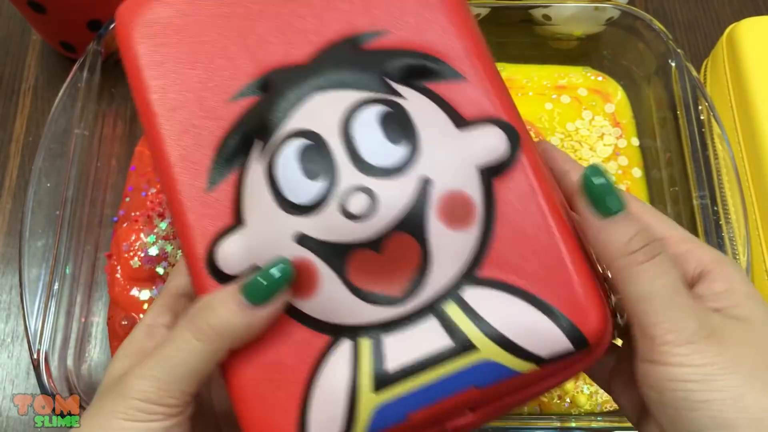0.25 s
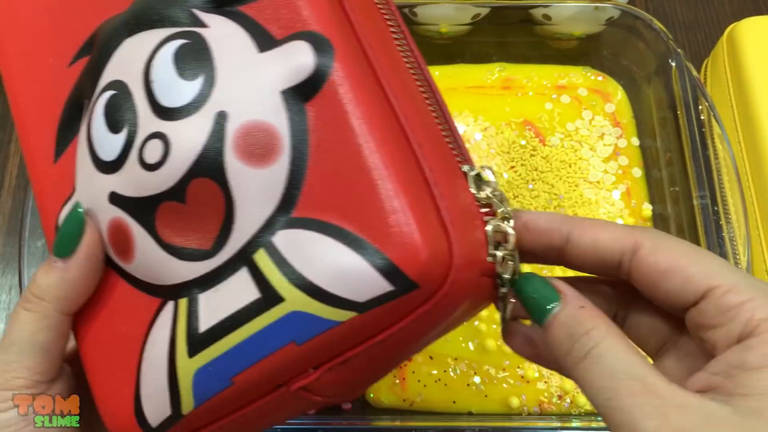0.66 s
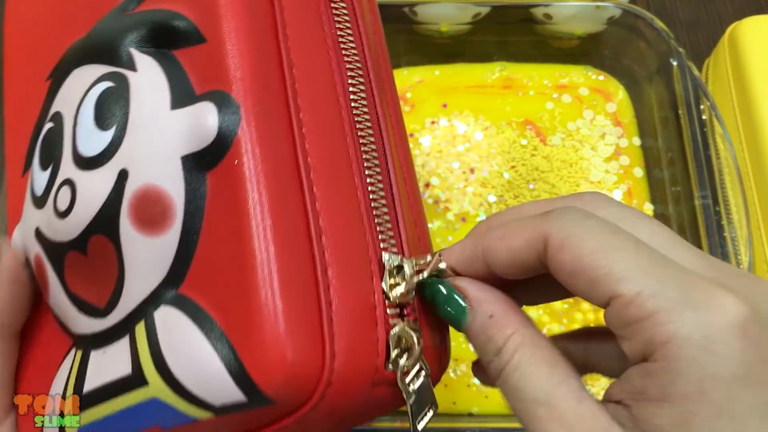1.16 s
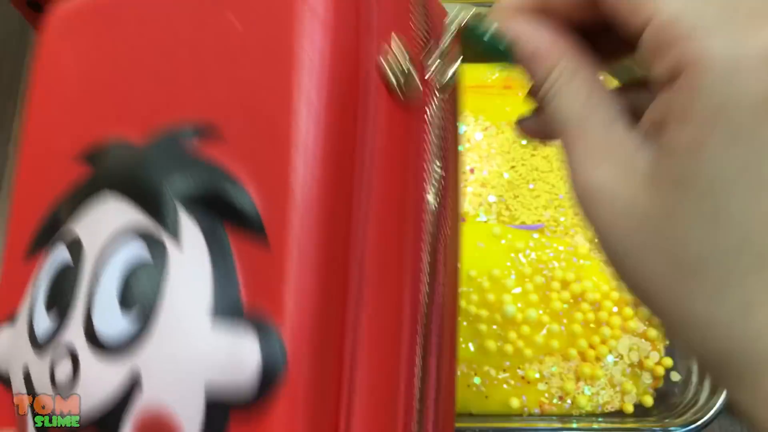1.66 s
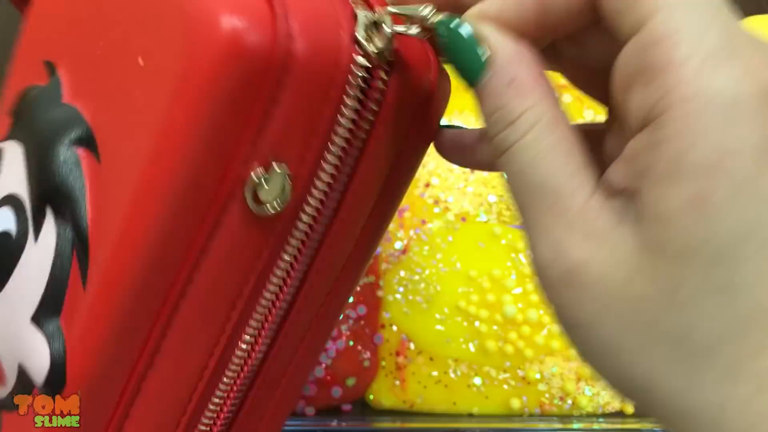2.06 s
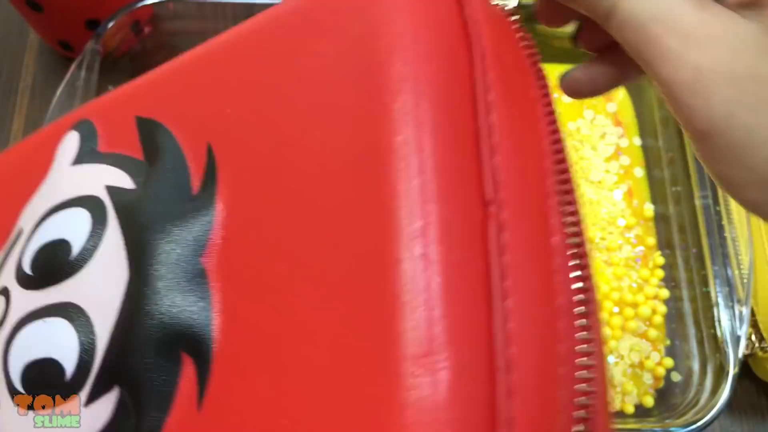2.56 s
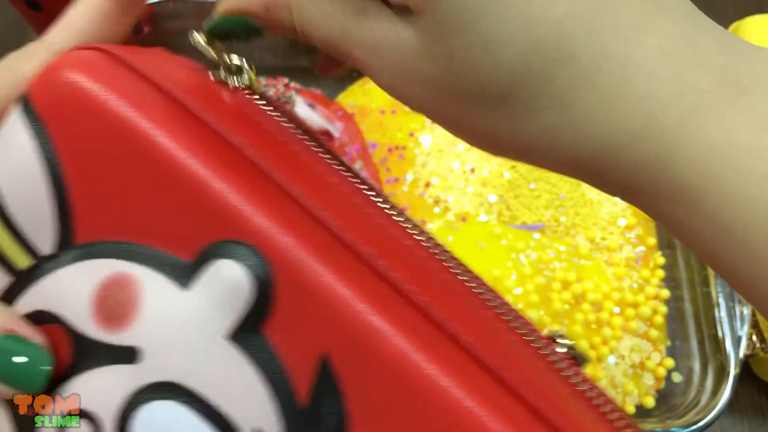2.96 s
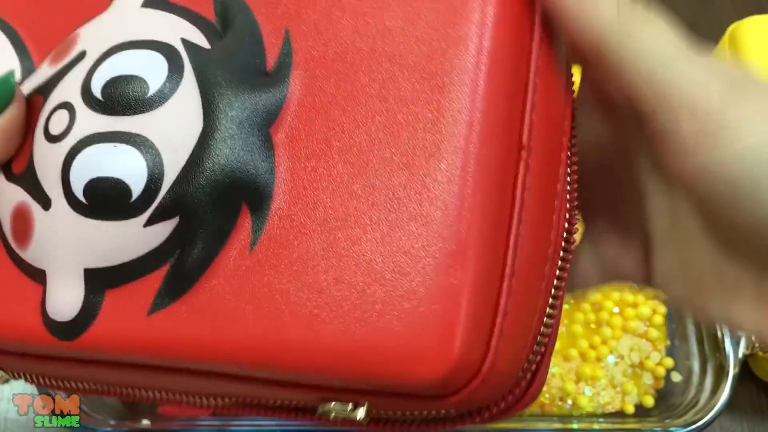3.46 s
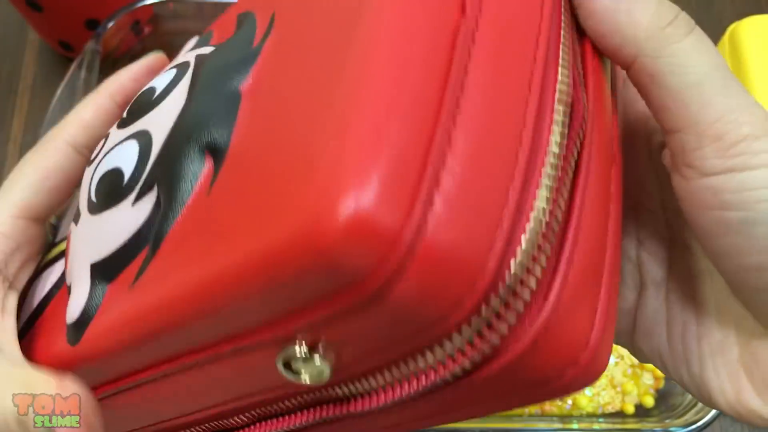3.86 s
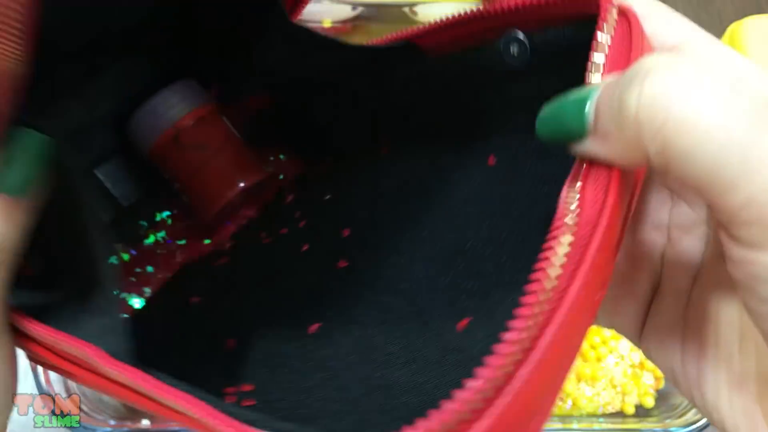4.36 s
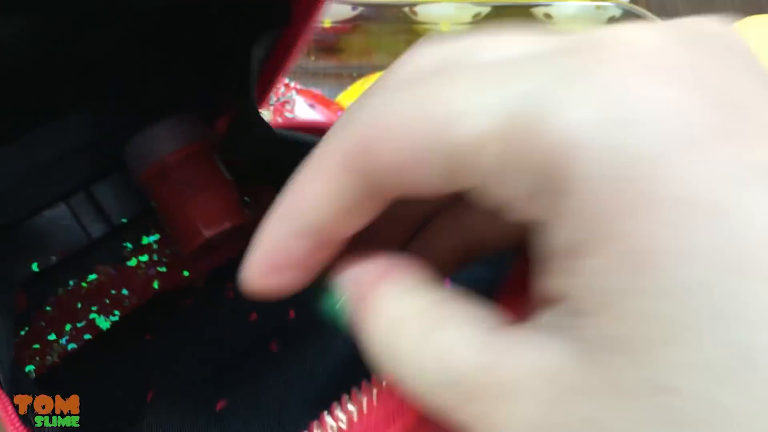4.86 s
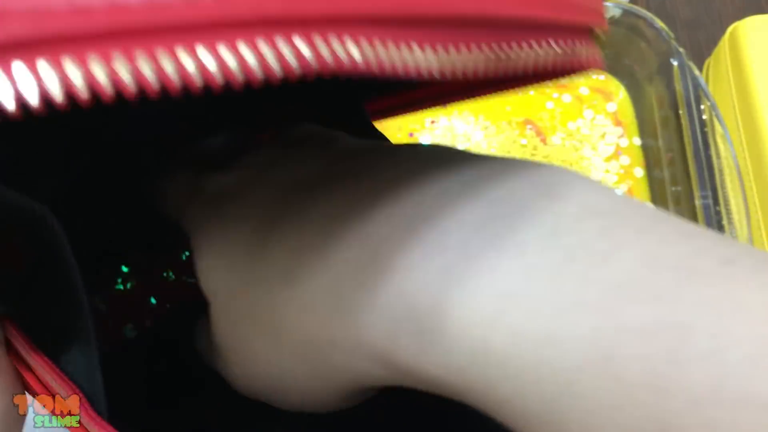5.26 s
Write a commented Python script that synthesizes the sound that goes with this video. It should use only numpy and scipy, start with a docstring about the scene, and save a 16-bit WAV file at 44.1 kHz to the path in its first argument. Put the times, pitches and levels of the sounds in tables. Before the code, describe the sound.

A stiff leatherette case is handled close to the microphone in a small, quiet room. From about 0.3 to 1.7 seconds the metal pull tabs of its zip tick and clink lightly under faint finger rubbing. At 1.8 seconds the zip makes a quick, rasping pull that buzzes through the shell and ends in a bump just after 2 seconds. More clinks follow, then three pulls in quick succession from 2.7 to 3.4 seconds. The tabs clink sharply around 3.6 to 3.7 seconds. The lid creaks briefly near 3.8 seconds and comes open with a loud, hollow cluster of knocks at about 4.1, creaking again around 4.5. From there until about 5.6 seconds a hand slides in over the cloth lining with soft rubbing, tiny ticks from the loose zip teeth and a few light knocks of small containers.

```python
"""Unzipping a make-up case

A stiff leatherette case is opened close by in a small room. Fingers fumble with the clinking
metal pull tabs, then draw the slider round in three quick pulls and a slow creep. Each zip
tooth clicks and kicks the shell, making it buzz. The lid creaks and is prised open with
a hollow knock, and a hand slides in over the cloth lining."""
import sys
import numpy as np
from scipy import signal
from scipy.fft import rfft, irfft, next_fast_len
from scipy.io import wavfile
from scipy.ndimage import uniform_filter1d

SR = 44100
rng = np.random.default_rng(int(sys.argv[2]) if len(sys.argv) > 2 else 0)


def to_wav(s):
    """Save 16-bit WAV."""
    ch = np.atleast_2d(s).T  # columns
    pcm = np.round(np.clip(ch, -1, 1) * 32767)  # PCM
    wavfile.write(sys.argv[1], SR, pcm.astype(np.int16))


N = 243431
TIME = np.arange(N) / SR

# Levels in the tables are relative. A ring time (t60) is the time taken to fade by 60 dB.
# Tone of the quiet room. Each row: frequency in Hz, level in dB.
ROOM_TONE = [(15, -21), (25, -45), (38, -4.5), (66, -12.5), (114, 0), (127, -7), (141, -29), (185, -7.5),
             (270, -33), (335, -59), (775, -40), (1940, -30.5), (5280, -36), (14000, -41), (16000, -49)]

# Low, middle and high parts of a sliding hand's sound. Each row: frequency in Hz, level in dB.
RUMBLE_TONE = [(35, -67), (60, 2), (108, -6.5), (189, -1), (265, -1.5), (395, -1), (470, -4.5), (584, 2),
               (695, -11), (800, -4), (1040, -52.5), (1760, -120)]
RUB_TONE = [(350, -29), (600, 7), (698, 6.5), (871, 0.5), (997, 0.5), (1110, 0.5), (1390, 2), (1580, -2),
            (1880, -6), (2290, 0), (3180, -17), (3550, 0), (4000, -11), (5200, -50.5), (8800, -120)]
HISS_TONE = [(1880, -39), (3200, 4), (3690, 9), (4020, -1), (5410, -3), (6030, 1), (8380, -2.5),
             (10500, -2), (11500, -5.5), (14100, -1), (16000, -12)]
# Hand strokes. Each row: start and length in seconds, then rumble, rub and hiss levels in dB.
HAND_STROKES = [(0.459, 0.12, -61.5, -64, -63), (0.56, 0.47, -63, -70, -70.5), (1.178, .6, -56, -63, -66.5),
                (1.38, 0.099, -66, -61, -57), (1.725, 0.084, -52.5, -55.5, -59),
                (2.05, 0.16, -47.5, -51.5, -53.5), (2.195, .44, -55.5, -58, -61),
                (2.388, 0.039, -47, -49, -50.5), (2.533, 0.059, -43.5, -47.5, -56),
                (2.83, 0.13, -42, -51, -56), (3.006, 0.13, -46, -50, -61), (3.323, .11, -43.5, -46, -50.5),
                (3.43, .33, -57.5, -53, -58.5), (3.75, .11, -49.5, -45, -52.5),
                (3.897, 0.052, -54, -44.5, -48), (3.961, .12, -45, -44, -47),
                (4.065, 0.12, -37.5, -48, -52), (4.194, 0.38, -59.5, -56.5, -60.5),
                (4.424, 0.062, -46, -44.5, -48.5), (4.554, 0.18, -53.5, -47.5, -49),
                (4.832, 0.036, -57.5, -51.5, -51.5), (4.87, 0.12, -65, -63.5, -63),
                (4.978, 0.046, -55, -52.5, -52.5), (5.048, 0.037, -56.5, -50, -57),
                (5.141, 0.22, -56.5, -48, -47.5), (5.279, 0.16, -52.5, -45, -46)]
# Ring of loose zip teeth. Each row: frequency in Hz, width in Hz, level in dB.
TICK_RESONANCES = [(10400, 500, 0), (10550, 400, 3), (13400, 1500, 0)]
# Air inside the open case. Each row: frequency in Hz, width in Hz, level in dB.
AIR_RESONANCES = [(152, 48, 11), (692, 39, -8), (1470, 72, 0), (1540, 100, 5.5)]

# Fingers, lid and small containers bumping the shell.
# Each row: time in seconds, boom level in dB, clack level in dB, boom pitch in Hz.
BUMPS = [(2.04, -18.5, -35, 470), (2.051, -20, -37, 400), (2.188, -24.5, -45, 410), (2.245, -32, -56, 183),
         (2.348, -29.5, -48, 410), (2.409, -29, -37.5, 367), (2.634, -36, -46, 865),
         (2.925, -27, -50, 322.7), (3.1, -27.5, -29, 194), (3.412, -30, -35, 412),
         (3.569, -38.5, -38.5, 662), (3.697, -23, -40, 610), (3.964, -36.5, -34, 193),
         (4.083, -9, -25.5, 556), (4.094, -22, -28, 605), (4.113, -19, -27, 547), (4.133, -27, -45, 600),
         (4.178, -22.5, -30, 397), (4.531, -36.5, -30, 536), (4.647, -31.5, -48, 710),
         (4.734, -34, -31.5, 650), (4.765, -47, -32, 710), (5.021, -29.5, -36, 710), (5.206, -38, -49, 388),
         (5.51, -37, -37.5, 690)]
# The stiff lid bending. Each row: start and end in seconds, then boom and clack levels in dB.
LID_CREAKS = [(3.78, 3.875, -38.5, -30.5), (3.908, 3.96, -50, -39), (4.446, 4.505, -35.5, -38.5)]
# Notes of the hollow case. Each row: frequency in Hz, level in dB, ring time in seconds.
CASE_MODES = [(125, 2, 0.16), (166.5, -2, 0.25), (232, -6.5, 0.23), (327, 5, 0.064), (423, -5.5, 0.086),
              (560, -9.5, 0.039), (602, -3, 0.033), (824, 10, 0.013), (996, 23.5, 0.009),
              (1425, -6.5, 0.069)]
# Tones of a hard contact and of the lightly tapped shell. Each row: frequency in Hz, level in dB.
CLACK_TONE = [(500, -41), (900, 7), (1400, 7), (2200, 2), (3000, -2.5), (4200, -4.5), (7000, -14),
              (11000, -9)]
NUDGE_TONE = [(130, -15.5), (250, -4.5), (420, 5.5), (580, -2.5), (900, -12)]

# Pull tabs hitting the slider and each other.
# Each row: time in seconds, then tinkle, clack and shell levels in dB, then tinkle pitch in Hz.
TAB_HITS = [(0.3068, -55, -51, -45, 13100), (0.566, -44, -37.5, -42, 13600),
            (0.5746, -49, -41, -36.5, 14700), (0.6673, -60, -48, -38.5, 12600),
            (0.6996, -45, -43.5, -35, 12700), (0.7227, -37.5, -42, -48, 13100),
            (0.8986, -44, -41.5, -38, 10400), (0.928, -37.5, -38, -34, 10400),
            (0.9432, -43, -45, -55, 10770), (0.964, -61, -32, -39, 9860), (0.9754, -54, -39, -36.5, 10300),
            (1.0204, -49, -44, -38, 9610), (1.1933, -30, -36.5, -32, 11000),
            (1.2293, -38, -39.5, -44, 10700), (1.2479, -39, -37, -36, 12600), (1.267, -39, -43, -37, 10900),
            (1.361, -33, -44, -52, 12200), (1.3941, -37, -43, -41, 9700), (1.4032, -38, -28.5, -29, 13800),
            (1.4463, -31, -35, -33.5, 9830), (1.4517, -32, -31, -39, 9800), (1.49, -40.5, -48, -50, 10800),
            (1.507, -42, -39, -40.5, 9900), (1.566, -49, -39.5, -51, 9400), (1.5868, -43, -32, -34, 10700),
            (1.6228, -38, -34, -31.5, 8300), (1.734, -36, -46, -62, 13900),
            (2.2152, -32.5, -33, -40, 10700), (2.2305, -36, -28, -36, 10930),
            (2.5588, -32, -35, -31, 13100), (2.5665, -31, -32, -30, 14400), (2.6013, -24, -27, -25, 13800),
            (2.902, -41, -54, -52, 13900), (3.0671, -51, -35.5, -39, 10120),
            (3.3959, -39.5, -30.5, -34, 10370), (3.6356, -24.5, -19.5, -21.5, 10540),
            (3.6595, -40, -29, -30, 9500), (3.676, -28.5, -26, -35, 10700),
            (3.705, -23.5, -23.5, -27.5, 9900), (4.4763, -31.5, -42, -33, 12500),
            (5.177, -48, -33, -46, 12500), (5.4213, -41, -34.5, -52, 14300)]
# Notes of a freely hanging tab. Each row: frequency in Hz, level in dB, ring time in seconds.
TAB_MODES = [(7000, 7, .1), (9430, 4, 0.8), (10410, 7, 0.21), (11900, -31, .08), (12900, 8, .06),
             (13480, 13.5, 0.071), (12300, -5, 0.2), (13700, -3, 0.27), (14330, -28, 0.14)]

# Slider speed, one list for each pull. Each row: time in seconds, speed in teeth per second.
PULL_SPEEDS = [
    [(1.8, 71), (1.83, 98.5), (1.848, 157.7), (1.868, 180), (1.914, 236), (1.93, 274), (1.966, 316),
     (2.058, 366), (2.09, 352.5)],
    [(2.69, 83), (2.722, 129.0), (2.754, 280), (2.758, 287), (2.796, 507), (2.802, 541.9), (2.824, 523),
     (2.874, 493), (2.88, 440)],
    [(2.91, 99.7), (2.928, 125.4), (2.974, 206), (2.982, 209.3), (3.004, 178), (3.016, 162), (3.032, 143.2),
     (3.046, 121.1), (3.05, 100)],
    [(3.09, 75), (3.144, 182), (3.17, 243.2), (3.202, 317), (3.232, 318), (3.26, 300.1), (3.298, 200),
     (3.32, 121), (3.36, 73.9)],
]
# Zip pulls. Each row: start and easing-off time in seconds; buzz, rasp and click levels in dB at the
# usual speed; time in seconds and boost in dB of the shell's boom; the same two for the slider's bite.
ZIP_PULLS = [(1.798, 2.016, -26, -25.5, -28.5, 1.964, 10, 2.008, 1),
             (2.675, 2.83, -30.5, -32.5, -36, 2.775, 2.5, 2.8, 2),
             (2.917, 3.016, -33, -38, -46.5, 3.0, 3, 2.965, 4),
             (3.097, 3.335, -27, -27.5, -33, 3.155, 3.5, 3.252, 7.5)]
# Tone of the shell on each side that the slider runs along. Each row: frequency in Hz, level in dB.
RIGHT_SIDE_TONE = [(41, -66), (70, -21), (129, -26), (173, -11), (248, -8), (316, -7.5), (511, -10.5),
                   (554, -55), (800, -21.5), (1040, -55), (1760, -120)]
TOP_SIDE_TONE = [(41, -47), (70, 0.5), (129, -3), (188, 6), (243, -4.5), (323, 6), (506, -3), (633, -10.5),
                 (800, -4), (1040, -45), (1760, -120)]
LEFT_SIDE_TONE = [(41, -71), (70, -34), (134, -33), (173, -3.5), (298, -3), (369, -5), (620, -6),
                  (715, -13.5), (800, -2.5), (1040, -57), (1760, -120)]
# Tones of the zip's rasping tape and clicking teeth. Each row: frequency in Hz, level in dB.
TAPE_TONE = [(380, -27), (650, -2.5), (672, -12.5), (783, -10.5), (957, -6.5), (1120, -8), (1290, -5.5),
             (1630, -12.5), (1800, -6.5), (1940, -10.5), (3200, -17.5), (4160, -18), (7040, -120)]
TEETH_TONE = [(1650, -48.5), (2800, 6.5), (3150, -4), (3460, 6.5), (4090, -2), (4700, -3.5), (5130, -6.5),
              (5560, -4.5), (6200, 0), (8360, -5.5), (10300, -6.5), (11700, -11.5), (15000, -10),
              (16000, -34)]
# Ring of the slider and the rows of teeth. Each row: frequency in Hz, width in Hz, level in dB.
SLIDER_RESONANCES = [(1305, 28, -1.5), (1700, 50, -16), (2260, 86, -15), (3890, 40, 3), (3730, 36, 10),
                     (4405, 30, -26), (4980, 180, 2), (6430, 26, -22)]


def from_db(db):
    """Turn decibels into a number to multiply by."""
    return 10 ** (np.asarray(db) / 20)


def rms_one(x):
    """Scale a sound so that its average strength (rms) is 1."""
    return x / np.sqrt(np.mean(x ** 2) + 1e-20)


def unit_hit(x):
    """Scale a hit so that its first 10 ms have a strength of 1."""
    return x / np.sqrt(np.mean(x[:SR // 100] ** 2) + 1e-20)


def evened(x, window_s=0.059):
    """Keep a sound's strength near 1 from moment to moment."""
    size = int(window_s * SR)
    power = uniform_filter1d(uniform_filter1d(x ** 2, size), size)
    return x / np.sqrt(np.abs(power) + 1e-12)


def coloured(x, tone):
    """Filter a sound to follow a tone table, falling steeply past the table's ends."""
    size = next_fast_len(len(x) + 4096, True)
    hz, db = np.transpose(tone)
    octave, points = np.log2(np.maximum(np.fft.rfftfreq(size, 1 / SR), 1)), np.log2(hz)
    outside = np.abs(octave - np.clip(octave, points[0], points[-1]))
    curve_db = np.interp(octave, points, db) - np.minimum(24 * outside, 60)
    # minimum phase: the filter rings after a hit, never before it
    cepstrum = irfft(np.log(from_db(curve_db)), size)
    cepstrum[1:size // 2] *= 2
    cepstrum[size // 2:] = 0
    return irfft(rfft(x, size) * np.exp(rfft(cepstrum)), size)[:len(x)]


def resonant(x, peaks):
    """The ringing that a set of resonances adds to a sound."""
    out = 0
    for hz, width, db in peaks:
        r = np.exp(-np.pi * width / SR)
        feedback = [1, -2 * r * np.cos(2 * np.pi * hz / SR), r * r]
        out = out + from_db(db) * (1 - r * r) / 2 * signal.lfilter([1, 0, -1], feedback, x)
    return out


def drift(turns_per_s):
    """A random wobble, about 1 in size."""
    knots = rng.standard_normal(2048)
    return np.interp(TIME * turns_per_s, np.arange(len(knots)), knots)


def rise(t, rise_s):
    """Climb smoothly from 0 towards 1."""
    return 1 - np.exp(-t / rise_s)


def fade(t, t60):
    """Die away by 60 dB in t60 seconds."""
    return from_db(-60 * t / t60)


def envelope(start, stop, attack_s, t60):
    """Swell, hold until the stop, then die away."""
    return np.clip((TIME - start) / attack_s, 0, 1) * fade(np.maximum(TIME - stop, 0), t60)


def favour(modes, centre_hz, db_per_octave):
    """The spot that is struck favours the notes near its own pitch."""
    return [(hz, db - db_per_octave * abs(np.log2(hz / centre_hz)), t60) for hz, db, t60 in modes]


def struck(modes, t, spread_db, detune):
    """An object's notes ring and fade; grip and point of contact vary their strength and pitch."""
    out = 0
    for k, (hz, db, t60) in enumerate(modes):
        strength = (-1) ** k * from_db(db + spread_db * rng.standard_normal())
        pitch = hz * (1 + detune * rng.standard_normal())
        out = out + strength * np.sin(2 * np.pi * pitch * t) * fade(t, t60)
    return out


def crack(t, t60, tail_db, tail_t60, rise_s):
    """Two things touch: a short burst of noise with a faint rattle after it."""
    decay = fade(t, t60) + from_db(tail_db) * fade(t, tail_t60)
    return rng.standard_normal(len(t)) * rise(t, rise_s) * decay


def add(out, start_s, sound):
    """Mix a sound in at the given time."""
    at = round(start_s * SR)
    out[at:at + len(sound)] += sound[:max(N - at, 0)]


def room_tone(level_db=-60):
    """The quiet room: a faint, steady, low noise."""
    return from_db(level_db) * rms_one(coloured(rng.standard_normal(N), ROOM_TONE))


def room_echo(x, t60=0.62, treble_t60=0.48, echo_db=-16, treble_db=-4, split_hz=3000):
    """Table and walls add a faint wash of echoes, in which the treble dies first."""
    t = TIME[:SR // 2]
    noise = rng.standard_normal(len(t)) * (t > .004)
    low = signal.sosfilt(signal.butter(2, split_hz, fs=SR, output="sos"), noise)
    high = signal.sosfilt(signal.butter(2, split_hz, "high", fs=SR, output="sos"), noise)
    tail = low * fade(t, t60) - from_db(treble_db) * high * fade(t, treble_t60)
    return x + from_db(echo_db) * signal.fftconvolve(x, tail / np.sqrt(np.sum(tail ** 2)))[:N]


def stroke_gains():
    """How strong the rumble, rub and hiss are as the hands hold and stroke the case."""
    power = from_db([[-68], [-73], [-74]]) ** 2   # fingers just holding it
    for start, length, *levels_db in HAND_STROKES:
        # a long stroke swells slowly; a brief one stops sooner
        shape = envelope(start, start + length, max(0.013, .12 * length), t60=min(0.51, 2.5 * length))
        power = power + np.outer(from_db(levels_db), shape) ** 2
    return np.sqrt(power)


def tooth_ticks(hiss_gain, ticks_per_s=24, against_hiss_db=-13.5, zip_open_s=2.9):
    """Once enough teeth lie loose, the hands stir them into tiny random ticks."""
    impulses = rng.random(N) < ticks_per_s / SR
    ticks = rms_one(resonant(impulses + 1e-18, TICK_RESONANCES))
    return ticks * hiss_gain * from_db(against_hiss_db) * (TIME > zip_open_s)


def hand_rubbing(catches_per_s=260, hand_in_s=5.04):
    """Skin slides over leatherette and cloth: smooth friction with many tiny catches."""
    caught = rng.random(N) < catches_per_s / SR
    sizes = from_db(4 * np.minimum(rng.exponential(1, N), 3))
    catches = rms_one(caught * sizes * rng.choice([-1, 1], N))
    flutter = from_db(2 * drift(70))
    friction = (rng.standard_normal(N) + 0.64 * catches) * flutter
    rumble_gain, rub_gain, hiss_gain = stroke_gains()
    rumble = rms_one(coloured(friction, RUMBLE_TONE)) * rumble_gain * from_db(1.5)
    rub = rms_one(coloured(friction, RUB_TONE)) * rub_gain * from_db(1.5)
    hiss = rms_one(coloured(friction, HISS_TONE)) * hiss_gain * from_db(0.13)
    # once the hand is inside, the air in the case rings along
    hollow = resonant((rumble + rub) * (TIME > hand_in_s), AIR_RESONANCES)
    return rumble + rub + hiss + hollow + tooth_ticks(hiss_gain)


def lid_slips(gap_s=0.022, centre_hz=678):
    """The bent lid creaks in a run of small, uneven slips, listed in rows like BUMPS."""
    rows = []
    for start, end, boom_db, clack_db in LID_CREAKS:
        for k, (late, weak, sharp) in enumerate(rng.standard_normal((12, 3))):
            at = start + gap_s * (k + .15 * late)
            if at < end:
                pitch = centre_hz * 2 ** (0.26 * sharp)
                rows.append((at, boom_db - 1.5 * weak, clack_db - 1.5 * weak, pitch))
    return rows


def case_knocks():
    """Each bump or slip thumps one panel and rings the hollow case, with a dull clack on top."""
    out, t = np.zeros(N), TIME[:SR // 4]
    padding = signal.butter(1, 3800, fs=SR, output="sos")
    bass_cut = signal.butter(2, 110, "high", fs=SR, output="sos")   # the knocks carry no deep bass
    for start, boom_db, clack_db, pitch in BUMPS + lid_slips():
        panel = unit_hit(np.sin(2 * np.pi * pitch * t) * fade(t, 0.022) * rise(t, 0.00067))
        modes = favour(CASE_MODES, pitch, db_per_octave=8)
        hollow = unit_hit(struck(modes, t, spread_db=2, detune=.01) * rise(t, .003))
        boom = unit_hit(signal.sosfilt(bass_cut, panel + from_db(-7) * hollow))
        slap = coloured(crack(t, 0.0063, -10.5, 0.029, rise_s=0.00068), CLACK_TONE)
        clack = unit_hit(signal.sosfilt(padding, slap))
        add(out, start, from_db(boom_db - 7) * boom + from_db(clack_db - 8) * clack)
    return out


def tab_clinks(held_t60=0.01, loose_above_db=-26):
    """A tab ticks, rings and nudges the shell; fingers choke the ring unless a hard hit frees it."""
    out, t = np.zeros(N), TIME[:SR // 3]
    for start, tinkle_db, clack_db, shell_db, pitch in TAB_HITS:
        shell = unit_hit(coloured(crack(t, 0.035, -30, 0.081, rise_s=0.0033), NUDGE_TONE))
        clack = unit_hit(coloured(crack(t, 0.0084, -21.5, 0.078, rise_s=0.00054), CLACK_TONE))
        modes = favour(TAB_MODES, pitch, db_per_octave=24)
        held = unit_hit(struck(modes, t, spread_db=3, detune=.015) * fade(t, held_t60) * rise(t, .0006))
        free = unit_hit(struck(modes, t, spread_db=1.5, detune=.002))
        free_db = -15 - 2 * max(loose_above_db - tinkle_db, 0)
        tick = unit_hit(resonant(crack(t, 0.0027, -37.5, 0.067, rise_s=0.00061), [(pitch, 5000, 0)]))
        tinkle = unit_hit(tick + held) + from_db(free_db) * free
        contact = from_db(clack_db - 10) * clack + from_db(tinkle_db - 8) * tinkle
        add(out, start, from_db(shell_db - 11) * shell + contact)
        add(out, start + rng.uniform(.0015, .005), from_db(-11) * contact)   # the link bounces once
    return out


def pull_gains(speed, pull, usual_teeth_per_s=317.6):
    """Buzz, rasp and click grow with speed; in each pull the shell booms and the slider bites once."""
    start, ease_off, buzz_db, rasp_db, click_db, boom_s, boom_db, bite_s, bite_db = pull
    doublings = np.log2(speed / usual_teeth_per_s)
    boom = boom_db * np.exp(-((TIME - boom_s) / 0.015) ** 2)
    bite = bite_db * np.exp(-((TIME - bite_s) / 0.043) ** 2)
    levels_db = [buzz_db + 7.5 * doublings + boom - 1.01 * bite,
                 rasp_db + 9 * doublings + bite,
                 click_db + 8 * doublings + bite]
    return from_db(levels_db) * envelope(start, ease_off, attack_s=0.045, t60=0.13)


def zip_pull(speed_points, pull, shell_tone, grind_s=.0006):
    """Each tooth kicks the shell and snaps through the slider; the other row answers more weakly."""
    speed = np.interp(TIME, *np.transpose(speed_points))
    teeth_passed = np.cumsum(speed) / SR + .022 * drift(300)
    strength = from_db(1.8 * rng.standard_normal(N))
    kicks = np.diff(np.floor(teeth_passed), prepend=0) * strength
    other_row = teeth_passed + .35 + .08 * drift(200)
    snaps = kicks + np.diff(np.floor(other_row), prepend=0) * .5 * strength
    # metal grinds for an instant after every snap, over the steady drag of the tape
    contact = signal.lfilter([1], [1, -np.exp(-1 / (grind_s * SR))], snaps)
    grind, drag = evened(contact * rng.standard_normal(N)), rng.standard_normal(N)
    kicks, snaps = evened(kicks), evened(snaps)
    buzz_gain, rasp_gain, click_gain = pull_gains(speed, pull)
    buzz = evened(coloured(kicks + .34 * drag, shell_tone)) * buzz_gain * from_db(3)
    rasp = evened(coloured(snaps + .7 * grind + .6 * drag, TAPE_TONE)) * rasp_gain * from_db(-1.5)
    click = evened(coloured(.56 * snaps + grind + .73 * drag, TEETH_TONE)) * click_gain * from_db(-0.78)
    return buzz + rasp + click + resonant(rasp + click, SLIDER_RESONANCES)


def scene():
    """Zip, tabs, knocks and hands over the quiet room, in one channel."""
    sides = (RIGHT_SIDE_TONE, TOP_SIDE_TONE, TOP_SIDE_TONE, LEFT_SIDE_TONE)
    zipper = sum(zip_pull(*pull) for pull in zip(PULL_SPEEDS, ZIP_PULLS, sides))
    background = room_tone()
    case = zipper + tab_clinks() + case_knocks() + hand_rubbing()
    return (room_echo(case) + background)[None]


def record(dry):
    """Cut the treble steeply above 16100 Hz."""
    return signal.sosfilt(signal.ellip(10, .2, 80, 16100, fs=SR, output="sos"), dry)


dry = scene()
out = record(dry)
to_wav(out)
```